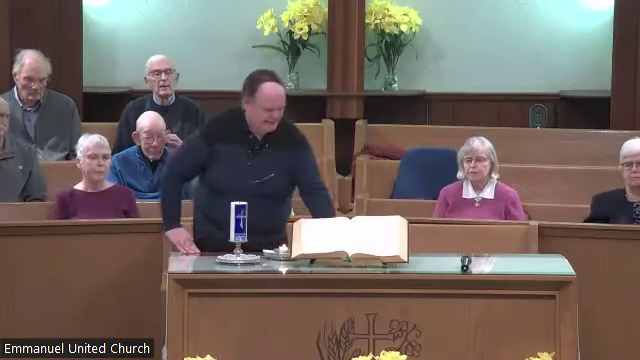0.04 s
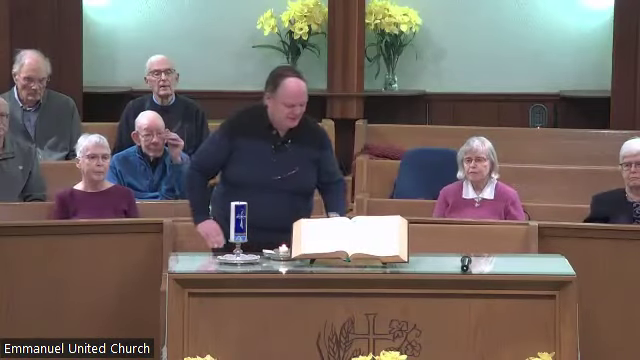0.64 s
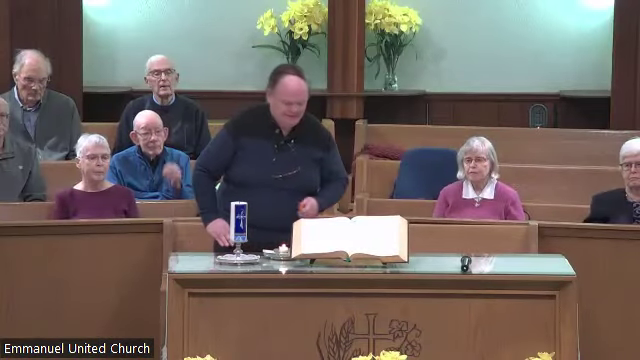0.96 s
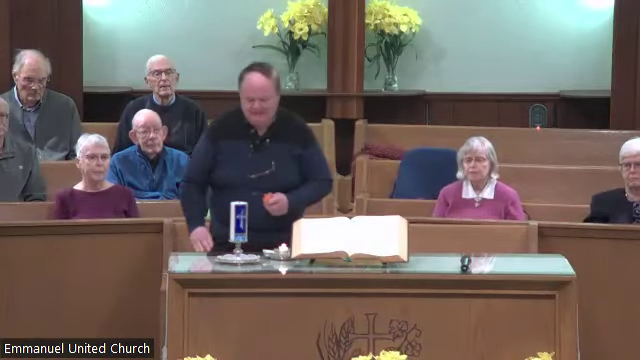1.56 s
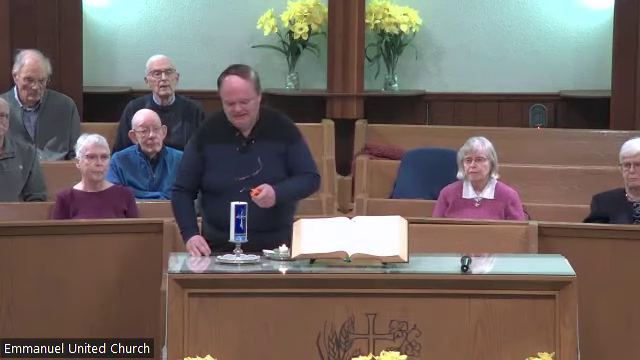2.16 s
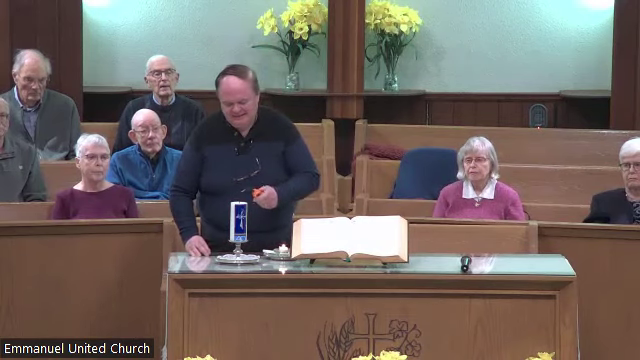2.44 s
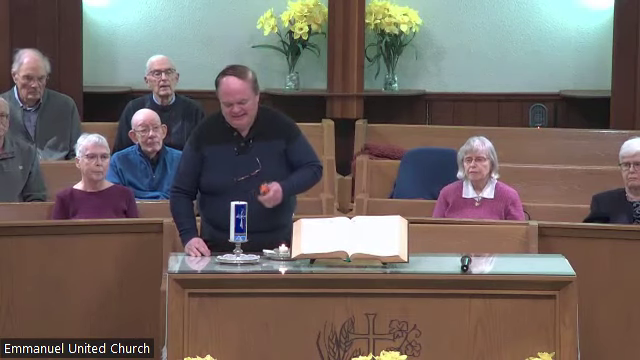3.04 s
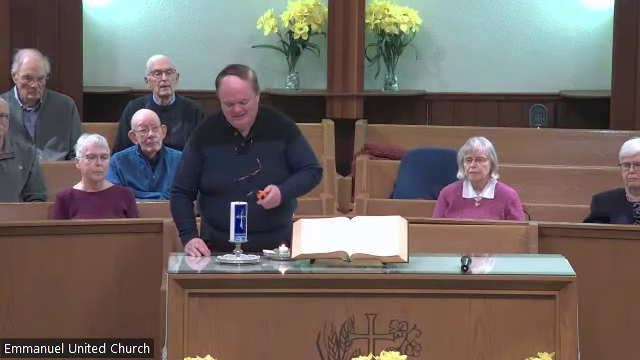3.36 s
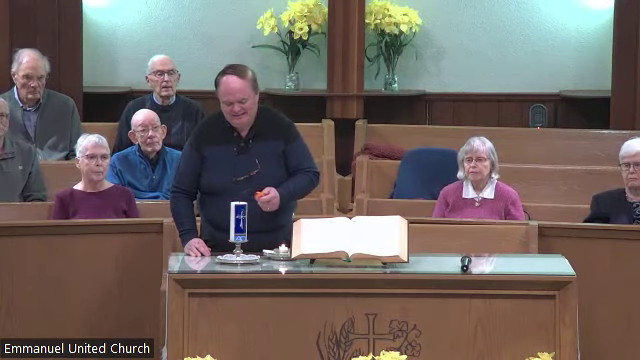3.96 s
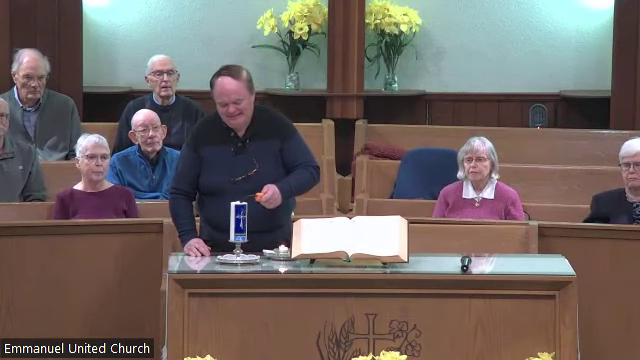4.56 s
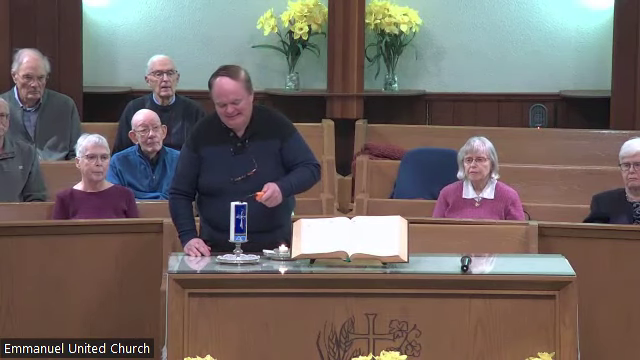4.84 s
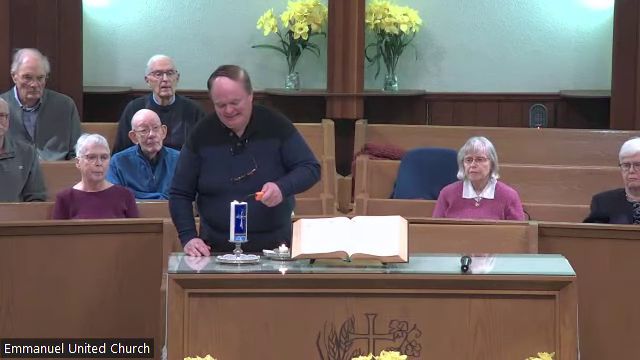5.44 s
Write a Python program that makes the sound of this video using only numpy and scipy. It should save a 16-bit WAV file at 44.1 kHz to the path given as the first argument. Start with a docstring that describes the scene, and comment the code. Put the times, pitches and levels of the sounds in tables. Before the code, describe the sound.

Over a faint ventilation hush in a quiet church, a sweater rustles close by, with small dull clicks, a tap on a table and the ticks and tiny squeaks of a lighter being handled. Farther off, wood bumps and a board groans, then one loud knock rings through the hall. The flint wheel is tried lightly and then struck three times, with more clicks and soft rubbing in between.

```python
"""In a quiet church, over the hush of the ventilation, a man picks up a flint lighter. His sweater
rustles close by, there are small dull clicks and a tap on the table, and the lighter ticks and squeaks
in his hand. From 1.5 s wood bumps further off and a board groans; at 2.5 s one loud knock rings through
the hall. He tries the wheel lightly, then from 4 s strikes it three times at a candle, its teeth rasping
on the flint, with more clicks and soft rubbing in between."""
import sys
import numpy as np
from scipy import signal
from scipy.fft import rfft, irfft, next_fast_len
from scipy.io import wavfile

SR = 44100
rng = np.random.default_rng(int(sys.argv[2]) if len(sys.argv) > 2 else 0)


def pcm_store(signal):
    """Save signal as 16-bit PCM."""
    levels = np.round(np.clip(np.atleast_2d(signal), -1, 1) * 32767)
    wavfile.write(sys.argv[1], SR, levels.astype(np.int16).T)


N = 246810
TIME = np.arange(N) / SR

# tiny specks tearing off, flint or fibre: freq_hz, level_db
SPECK_SPECTRUM = [(150, -55), (500, -89), (1100, -37), (1700, -8), (2500, -2.5), (3300, -6.5), (5200, 3),
                  (7000, -2), (9500, -3), (12500, -10), (15000, -26)]
# blows on distant wood: start_s, level_db, decay_s, brightness_hz, hall_db
WOOD_BLOWS = [(1.514, -33.5, 0.021, 433, -23), (2.491, -41, 0.0065, 4040, -31),
              (2.498, -19, 0.0036, 10600, -12.5), (2.51, -20, 0.0034, 2920, -22.5)]
# thumb on the flint wheel: start_s, spin_s, spin_db, lead_in_s, lead_in_db, snap_db
WHEEL_STRIKES = [(3.9994, 0.038, -44, 0.046, -51.5, -27.5), (4.5511, 0.031, -44, 0.0058, -43.5, -30.5),
                 (5.3219, 0.043, -46, 0.0264, -43, -30.5)]


def from_db(db):
    """Decibels to gain."""
    return 10 ** (np.asarray(db) / 20)


def rms_one(x):
    """Scale to unit power."""
    return x / np.sqrt(np.mean(x ** 2) + 1e-20)


def at_hz(points, hz):
    """Read a table on a log-frequency axis."""
    table = np.array(points)
    return np.interp(np.log(np.maximum(hz, 1)), np.log(table[:, 0]), table[:, 1])


def butter(x, hz, kind, order=2):
    """Causal Butterworth filter."""
    sos = signal.butter(order, np.clip(hz, 10, SR * .45), kind, fs=SR, output="sos")
    return signal.sosfilt(sos, x + 1e-18)


def colour(x, spectrum):
    """Give an excitation a spectrum; rms 1."""
    size = next_fast_len(N)
    gain = from_db(at_hz(spectrum, np.arange(size // 2 + 1) * SR / size))
    return rms_one(irfft(rfft(x, size) * gain, size)[:N])


def noise(spectrum):
    """Steady coloured noise; rms 1."""
    return colour(rng.standard_normal(N), spectrum)


def wander(rate_hz):
    """Low-passed random drift; rms 1."""
    return rms_one(butter(rng.standard_normal(N), rate_hz, "low"))


def grains(per_s, spread_db):
    """Tiny slips at random moments, of uneven size."""
    sizes = from_db(spread_db * np.minimum(rng.exponential(1, N), 4)) * rng.choice([-1, 1], N)
    return sizes * (rng.random(N) < per_s / SR)


def burst(start_s, decay_s, hold_s=0, rise_s=0.00065):
    """Contact envelope: linear rise, hold, exponential fall."""
    age_s = np.maximum(TIME - start_s, 0)
    return np.minimum(age_s / rise_s, 1) * np.exp(-np.clip((age_s - hold_s) / decay_s, 0, 50))


def stroke(start_s, length_s, swell_s):
    """Sliding envelope: eases in, holds, settles."""
    ease = np.sin(np.pi / 2 * np.clip((TIME - start_s) / swell_s, 0, 1)) ** 2
    return ease * burst(start_s, decay_s=0.026, hold_s=length_s)


def creep(moves, swell_share=0.21):
    """Envelope of slow slides, each swelling over a share of its length."""
    return sum(from_db(db) * stroke(s, length_s, swell_share * length_s) for s, length_s, db in moves)


def strike_modes(times_s, levels_db, modes, vary_db):
    """Each blow rings every mode with its own strength and sign."""
    out, at = np.zeros(N), np.round(np.asarray(times_s) * SR).astype(int)
    chance = rng.standard_normal((len(at), len(modes), 2))
    for k, (hz, db, t60_s) in enumerate(modes):
        blows = np.full(N, 1e-18)
        blows[at] = from_db(levels_db + db + vary_db * chance[:, k, 0]) * np.sign(chance[:, k, 1])
        radius, angle = from_db(-60 / (t60_s * SR)), 2 * np.pi * hz / SR
        out += signal.lfilter([0, np.sin(angle)], [1, -2 * radius * np.cos(angle), radius ** 2], blows)
    return out


def ventilation():
    """Steady hush of ventilation and microphone."""
    # hush: freq_hz, level_db
    air_spectrum = [(30, -11), (80, -55), (125, -21), (170, -23), (232, 4.5), (340, -4.5), (480, -6),
                    (610, -3.5), (900, -11), (1600, -10.5), (3000, -16), (8000, -19), (12500, -24),
                    (15000, -67)]
    return from_db(-72.5) * noise(air_spectrum)


def cloth_folds(x, rate_hz=29, depth_db=1):
    """Folds shift the cloth's colour: each third-octave swells and fades on its own; rms 1."""
    size = next_fast_len(N)
    spectrum, out = rfft(x, size), 0
    centres_hz = np.geomspace(1000, 14000, 12)
    log_hz = np.log(np.maximum(np.arange(size // 2 + 1) * SR / size, 1))
    for share in np.eye(len(centres_hz)):
        band = irfft(spectrum * np.interp(log_hz, np.log(centres_hz), share), size)[:N]
        out = out + band * from_db(depth_db * wander(rate_hz))
    return rms_one(out)


def sleeve(hiss_db, rub_db, snag_db):
    """Fibres slip over each other: fine hiss above a duller rub, crackling where both are strong."""
    # sleeve over sweater: start_s, length_s, swell_s, hiss_db, rub_db
    strokes = [(0, 0.053, 0.0035, -99, -56.5), (0.266, 0.15, .07, -59.5, -55),
               (0.428, 0.51, 0.19, -50, -62.5), (0.881, 0.13, 0.089, -48, -50),
               (1.049, 0.21, .05, -58.5, -58.5), (1.507, 0.062, 0.016, -51, -55),
               (1.604, 0.25, 0.05, -51, -59.5), (1.833, 0.65, 0.15, -63.5, -63.5),
               (1.99, 0.029, 0.014, -51.5, -58), (2.193, 0.044, .03, -51.5, -59),
               (2.679, 0.037, .02, -50, -50), (2.895, 0.13, 0.03, -59, -56.5),
               (3.677, 0.15, 0.048, -61, -60), (3.847, 0.1, 0.13, -68, -67), (4.272, 0.13, 0.078, -50, -63),
               (5.037, 0.12, .11, -56, -55.5)]
    # fibre hiss: freq_hz, level_db
    hiss_spectrum = [(1760, -27), (3000, 6.5), (4200, 8.5), (5200, 7), (7530, 11), (10800, 8.5),
                     (13100, 1.5), (15500, -21)]
    # cloth rub: freq_hz, level_db
    rub_spectrum = [(300, -31.5), (750, -12), (1050, -6.5), (1600, -5.5), (2400, -2), (3200, -9),
                    (4500, -26), (7000, -20), (15000, -79)]
    hiss_gain, rub_gain = 0, 0
    for start_s, length_s, swell_s, high_db, low_db in strokes:
        moving = stroke(start_s, length_s, swell_s)
        hiss_gain = hiss_gain + moving * from_db(high_db + hiss_db)
        rub_gain = rub_gain + moving * from_db(low_db + rub_db)
    snag_gain = from_db(snag_db) * np.sqrt(hiss_gain * rub_gain)
    snags = colour(grains(per_s=250, spread_db=2.5), SPECK_SPECTRUM)
    flutter = rms_one(from_db(3 * wander(rate_hz=110)))   # ribs of the knit
    hiss = cloth_folds(colour(grains(per_s=12000, spread_db=-2.0), hiss_spectrum))
    rub = cloth_folds(colour(grains(per_s=6600, spread_db=3.0), rub_spectrum))
    return hiss_gain * flutter * hiss + rub_gain * rub + snag_gain * snags


def click_contacts(rebound_s=0.0075, ring_loss_db=3, edge_loss_db=14):
    """Clicks and their weaker, duller rebounds: start_s, ring_db, edge_db."""
    # small nearby clicks: start_s, ring_db, edge_db, contact_count
    clicks = [(0.055, -35.5, -52, 1), (0.0761, -26.5, -56, 3), (1.587, -55, -65, 1),
              (4.4505, -33.5, -90, 1), (4.4855, -43, -76, 1), (4.499, -43.5, -76, 3), (4.626, -41, -66, 1),
              (4.656, -41, -76, 2), (4.824, -38.5, -63, 3), (4.860, -45, -42, 1), (4.8768, -30.5, -30, 2),
              (4.8871, -31, -56, 3)]
    return [(start_s + k * rebound_s, ring_db - k * ring_loss_db, edge_db - k * edge_loss_db)
            for start_s, ring_db, edge_db, count in clicks for k in range(count)]


def dull_clicks(ring_db):
    """Each contact sets off a short hollow ring."""
    # hollow ring: freq_hz, level_db, t60_s
    modes = [(1022, -17.5, 0.082), (1190, -19.5, 0.017), (1415, -13.5, 0.061), (1820, -11, 0.019),
             (1806, -6, 0.033), (1990, 0.5, 0.011), (2540, -11, 0.041)]
    times_s, levels_db, _ = np.transpose(click_contacts())
    ring = strike_modes(times_s, levels_db + ring_db, modes, vary_db=0.5)
    return butter(ring, [920, 2750], "band", order=4)


def click_edges(edge_db, decay_s):
    """Harder clicks begin with a dry, pitched snap."""
    # bright edge: freq_hz, level_db
    edge_spectrum = [(2600, -16), (3300, 3), (3750, 13.5), (4400, -15), (5400, 3), (6500, -29), (8300, -12),
                     (9500, -6.5), (10700, -4), (12500, -38)]
    envelope = sum(from_db(db + edge_db) * burst(start_s + .001, decay_s, hold_s=.003, rise_s=.001)
                   for start_s, _, db in click_contacts())
    return envelope * noise(edge_spectrum)


def lighter_ticks(crack_db, body_db, body_width):
    """The lighter shifts in the hand: a bright crack and a short resonance of the plastic case."""
    # ticks: start_s, crack_db, case_db, case_hz
    ticks = [(0.0565, -35.5, -43, 1830), (.0645, -51, -33, 1990), (0.0757, -57, -32.5, 2680),
             (0.3615, -45, -76, 2600), (.537, -30, -34.5, 3230), (0.549, -61, -41, 2470),
             (0.847, -30.5, -35.5, 2090), (0.8517, -32, -35, 2610), (0.8848, -36, -25.5, 2850),
             (0.9648, -33, -28, 1820), (0.985, -31, -35, 3700), (1.011, -36, -38, 2600),
             (1.5108, -43, -55, 2460), (1.559, -34, -34, 2770), (1.5697, -42, -35, 1250),
             (1.6201, -42.5, -32.5, 2250), (1.6457, -47, -33, 1490), (2.0083, -33, -57, 2700),
             (2.016, -47, -41, 2900), (2.155, -49, -44.5, 2520), (3.676, -54.5, -42, 2240),
             (3.7182, -56, -38.5, 2420), (3.9883, -42, -55, 3180), (4.3447, -48, -38, 1710),
             (4.367, -60, -39, 1500), (4.5397, -44, -39, 3060), (4.58, -31, -44, 5500),
             (4.5818, -32, -26.5, 6300)]
    # crack: freq_hz, level_db
    crack_spectrum = [(1000, -35), (2500, -15.5), (4000, 2.5), (6500, 7.5), (9500, 9), (13000, -2.5),
                      (15500, -26)]
    crack_gain, case = 0, np.zeros(N)
    white = rng.standard_normal((len(ticks), SR // 10))
    for (start_s, edge_db, case_db, case_hz), chatter in zip(ticks, white):
        rattle = from_db(-15) * burst(start_s + .008, decay_s=0.013)   # a loose part answers
        envelope = burst(start_s, decay_s=0.0026, hold_s=0.0012, rise_s=0.0016) + rattle
        crack_gain = crack_gain + from_db(edge_db) * envelope
        ring = butter(chatter, [case_hz / (1 + body_width), case_hz * (1 + body_width)], "band")
        ring = rms_one(butter(ring, [1100, 6000], "band"))
        span = slice(int(start_s * SR), int(start_s * SR) + len(ring))
        case[span] += from_db(case_db) * envelope[span] * ring
    return from_db(crack_db) * crack_gain * noise(crack_spectrum) + from_db(body_db) * case


def table_tap():
    """A hollow tock: each mode of the table top swells briefly and dies at its own rate."""
    # soft contacts: start_s, level_db
    taps = [(.2807, -36.5), (.2875, -57)]
    # table top: freq_hz, level_db, decay_s, swell_s
    modes = [(453, -9.5, 0.0098, 0.005), (564, -1.5, 0.0037, 0.00455), (1239, -4.5, 0.01, 0.0037),
             (1480, -3, 0.0031, 0.0019), (2090, -10, 0.035, 0.0017), (2185, 6, 0.00067, 0.0045),
             (2820, -9, 0.0048, 0.0018)]
    out = 0
    for start_s, tap_db in taps:
        for hz, mode_db, decay_s, swell_s in modes:
            envelope = from_db(tap_db + mode_db) * burst(start_s, decay_s, swell_s, rise_s=swell_s)
            out = out + envelope * np.sin(2 * np.pi * hz * (TIME - start_s))
    return out


def finger_squeaks(waver_hz=150, decay_s=0.006):
    """Skin sticks and slips on plastic: a brief, unsteady tone that glides as the grip changes."""
    # finger slips: start_s, length_s, level_db, pitch_hz, glide_hz_per_s
    slips = [(0.6502, 0.0044, -41, 2427, 4), (0.863, 0.021, -41.5, 3083, -12000),
             (1.524, 0.019, -45.5, 2460, 17997)]
    out = 0
    for start_s, length_s, db, hz, glide_hz_per_s in slips:
        pitch_hz = hz + glide_hz_per_s * np.clip(TIME - start_s, 0, length_s + decay_s)
        pitch_hz += waver_hz * wander(rate_hz=305)
        grip = 1 + 0.58 * wander(rate_hz=400)
        tone = rms_one(grip * np.sin(2 * np.pi * np.cumsum(pitch_hz) / SR))
        out = out + from_db(db) * tone * burst(start_s, decay_s, length_s, rise_s=0.73 * length_s)
    return out


def knocks():
    """Dense wood resonances, duller for a softer contact; returns direct sound and hall feed."""
    # knocked wood: freq_hz, level_db
    wood_spectrum = [(40, -2), (80, -33), (130, -10.5), (240, -5), (450, -6.5), (750, -7.5), (1400, -10),
                     (2300, -17), (3100, -16.5), (3700, -20.5), (5000, -22.5), (9000, -24.5), (12500, -26),
                     (15000, -53)]
    wood, direct, hall_feed = noise(wood_spectrum), 0, 0
    for start_s, db, decay_s, bright_hz, hall_db in WOOD_BLOWS:
        envelope = from_db(db) * burst(start_s, decay_s, hold_s=0.00036, rise_s=0.0032)
        direct = direct + butter(wood * envelope, bright_hz, "low", order=1)
        impulse = signal.unit_impulse(N, int(start_s * SR))
        blow = colour(impulse, wood_spectrum) / np.sqrt(N)   # unit energy
        hall_feed = hall_feed + butter(from_db(hall_db) * blow, bright_hz, "low", order=1)
    return direct, hall_feed


def knock_ring(ring_db, full_ring_hz):
    """A few strong modes ring on after each knock; a soft contact barely wakes them."""
    # knocked wood: freq_hz, level_db, t60_s
    modes = [(1226, -10, .14), (1355, -8, .16), (1583, -10, .14), (1875, -8, .15), (2762, -3, .06),
             (3048, -6, .13), (4920, -13, .1), (5830, -12, .07)]
    times_s, levels_db, _, bright_hz, _ = np.transpose(WOOD_BLOWS)
    softness_db = 20 * np.log10(np.minimum(bright_hz / full_ring_hz, 1))
    return strike_modes(times_s, levels_db + softness_db + ring_db, modes, vary_db=1.5)


def floor_bumps(low_cut_hz):
    """Soft blows thud in the low modes of the boards."""
    # bumps through the floor: start_s, level_db, brightness_hz
    bumps = [(1.525, -49, 151), (1.584, -52, 120), (1.667, -53, 140), (1.849, -57.5, 141)]
    # floor boards: freq_hz, level_db, t60_s
    modes = [(118, 2, 0.071), (170, 0, 0.12), (212, -12, 0.12), (240, -4, 0.13), (270, -13.5, 0.1)]
    thuds = sum(butter(strike_modes([start_s], db, modes, vary_db=-2.0), bright_hz, "low")
                for start_s, db, bright_hz in bumps)
    return butter(thuds, low_cut_hz, "high", order=3)


def hollow_rub():
    """Slow, grainy rubbing with a hollow tone near 1 kHz."""
    # soft rubs: start_s, length_s, level_db
    rubs = [(1.548, 0.031, -51.5), (4.229, 0.35, -62.5), (4.592, 0.1, -58), (4.799, 0.19, -53.5),
            (5.269, 0.27, -59.5)]
    # hollow tone: freq_hz, level_db
    hollow_spectrum = [(150, -61), (550, -33), (820, -18), (960, -8), (1050, -4), (1230, -16), (1600, -11),
                       (1950, -8), (2400, -16), (4000, -28), (15000, -44)]
    return creep(rubs) * colour(grains(per_s=2800, spread_db=-0.5), hollow_spectrum)


def board_groans(resonance_hz=(193, 264)):
    """Small slips between the boards keep their main resonance sounding."""
    # weight shifting on a board: start_s, length_s, level_db
    groans = [(1.824, 0.042, -56.5), (1.945, 0.085, -65.5), (2.06, .15, -72.5)]
    drone = rms_one(butter(grains(per_s=460, spread_db=2.0), resonance_hz, "band"))
    return creep(groans) * drone


def flint_wheel(release_s, teeth_per_s, bite, tooth_decay_share, uneven_db):
    """Each tooth tears specks off the flint; a slow turn is duller and makes the case sing."""
    # case resonance: freq_hz, level_db
    case_spectrum = [(800, -43.5), (1400, -6), (1900, -4.5), (2450, 1.5), (2800, -3), (3400, -31),
                     (8000, -62)]
    # wheel turns: start_s, length_s, level_db, brightness_hz, case_db
    turns = [(3.716, 0.033, -46.5, 2980, -4.5)]   # light try
    for start_s, spin_s, spin_db, lead_s, lead_db, _ in WHEEL_STRIKES:
        turns.append((start_s - lead_s, lead_s, lead_db, 4730, -9.5))   # slow lead-in
        turns.append((start_s, spin_s, spin_db, 14400, -20))   # fast spin
    tooth_hz = teeth_per_s * (1 + .25 * wander(rate_hz=61))
    tooth, phase = np.divmod(np.cumsum(np.abs(tooth_hz)) / SR, 1)
    depth = from_db(uneven_db * np.clip(rng.standard_normal(N), -2, 2))[tooth.astype(int)]
    specks = grains(per_s=7000, spread_db=0.5) * (1 + bite * depth * np.exp(-phase / tooth_decay_share))
    rasp, case, out = colour(specks, SPECK_SPECTRUM), colour(specks, case_spectrum), 0
    for start_s, length_s, db, bright_hz, case_db in turns:
        turning = from_db(db) * burst(start_s, release_s, hold_s=length_s, rise_s=0.0017)
        out = out + butter(rasp * turning, bright_hz, "low") + from_db(case_db) * case * turning
    return out


def wheel_snaps():
    """Each spin starts with a crisp snap as the wheel breaks free of the flint."""
    # snap: freq_hz, level_db
    snap_spectrum = [(1500, -28), (2600, 2), (3300, 0.5), (4000, 6), (5000, 0), (6700, 7.5), (9000, -4),
                     (12500, -4), (15500, -27)]
    envelope = sum(from_db(db) * burst(start_s, decay_s=.0014, hold_s=.0016, rise_s=.001)
                   for start_s, *_, db in WHEEL_STRIKES)
    return envelope * noise(snap_spectrum)


def hall(x, build_s, bass_lag_cycles):
    """Diffuse reflections build up and die away; the bass comes later, the top fades first."""
    # church reverberation: freq_hz, t60_s
    decay_times = [(120, 0.9), (300, 1.05), (800, 1.08), (2000, 1.08), (5000, 1.02), (9000, 0.8),
                   (14000, 0.7)]
    age_s, response = TIME[:N // 3], 0
    edges_hz = np.geomspace(60, 16000, 15)
    for low_hz, high_hz in zip(edges_hz, edges_hz[1:]):
        hz = np.sqrt(low_hz * high_hz)
        band = butter(rng.standard_normal(len(age_s)), [low_hz, high_hz], "band")
        swell = 1 - np.exp(-(age_s / (build_s + bass_lag_cycles / hz)) ** 4)
        response = response + band * swell * from_db(-60 * age_s / at_hz(decay_times, hz))
    return signal.fftconvolve(x, response / np.sqrt(np.sum(response ** 2)))[:N]


def scene():
    """Close sounds are mostly direct, distant ones mostly hall."""
    wheel = flint_wheel(release_s=0.013, teeth_per_s=150, bite=2.0, tooth_decay_share=.4, uneven_db=3.0)
    wheel = wheel + wheel_snaps()
    ticks = lighter_ticks(crack_db=-4.5, body_db=-3.0, body_width=0.48) + finger_squeaks()
    clicks = dull_clicks(ring_db=1.0)
    edges = click_edges(edge_db=-3.5, decay_s=0.0013)
    tap = table_tap()
    cloth = sleeve(hiss_db=-3.0, rub_db=-3.0, snag_db=-11) + hollow_rub()
    knock, knock_feed = knocks()
    ring = knock_ring(ring_db=-13.5, full_ring_hz=2800)
    knock = butter(knock + ring, 600, "high", order=4)   # its bass arrives only via the hall
    bumps = floor_bumps(low_cut_hz=140) + from_db(-4) * board_groans()
    near_send = (from_db(-1.5) * wheel + from_db(-11) * (ticks + tap)
                 + from_db(-5.5) * cloth + from_db(-12.5) * clicks)
    far_send = from_db(13) * knock_feed + from_db(-11.5) * ring + from_db(3) * bumps
    room = hall(near_send, build_s=0.00062, bass_lag_cycles=3.4)
    room += hall(far_send, build_s=0.001, bass_lag_cycles=8.0)
    close = wheel + ticks + clicks + tap + edges + cloth
    return (close + knock + from_db(4.5) * bumps + room + ventilation())[None]


def record(dry):
    """The microphone sheds its bass; the top is cut steeply."""
    low_cut_hz, high_cut_hz = 43, 15300
    thin = butter(dry, low_cut_hz, "high", order=1)
    return signal.sosfiltfilt(signal.ellip(10, .05, 70, high_cut_hz, fs=SR, output="sos"), thin)


dry = scene()
out = record(dry)
pcm_store(out)
```